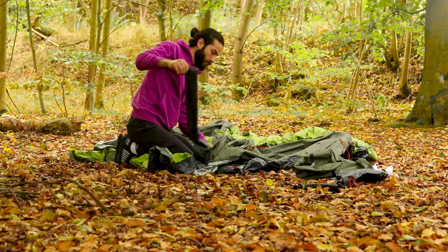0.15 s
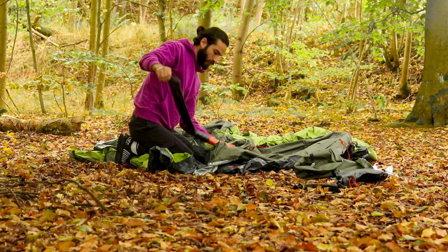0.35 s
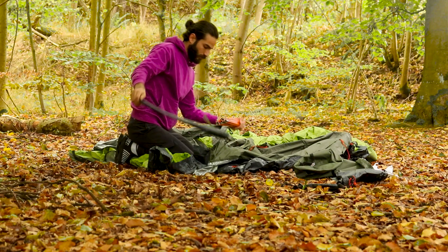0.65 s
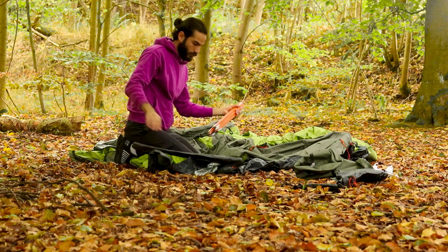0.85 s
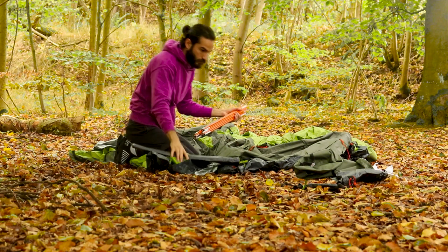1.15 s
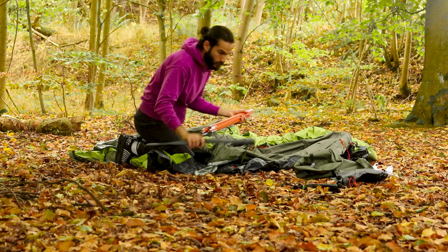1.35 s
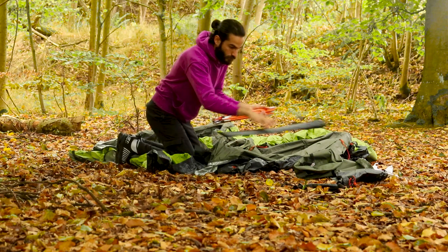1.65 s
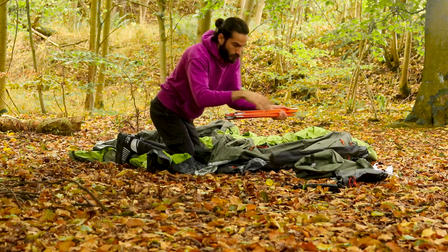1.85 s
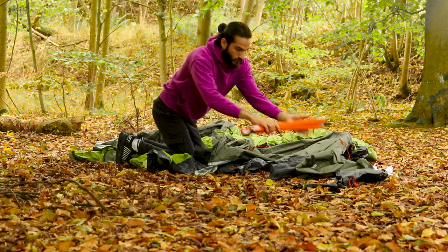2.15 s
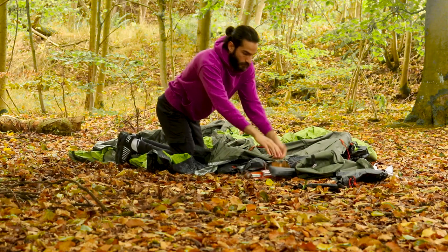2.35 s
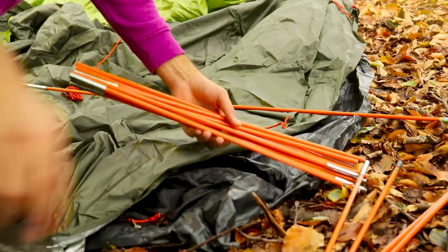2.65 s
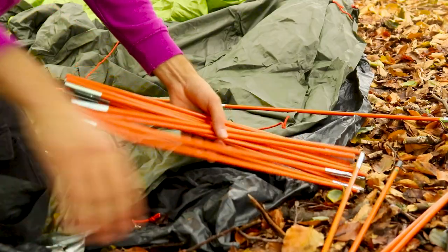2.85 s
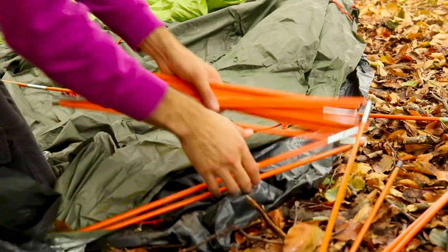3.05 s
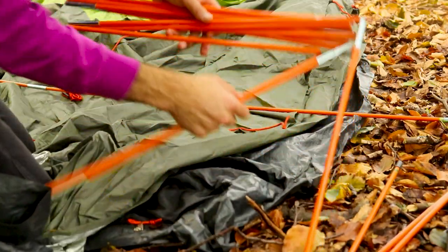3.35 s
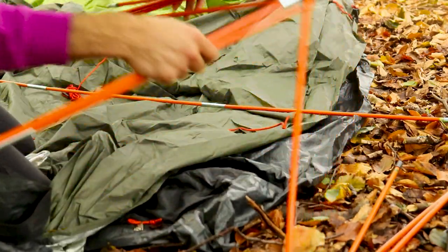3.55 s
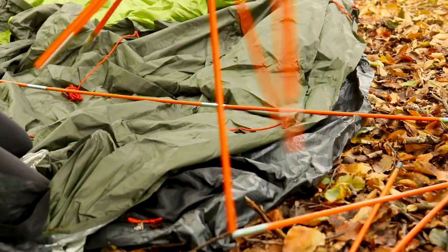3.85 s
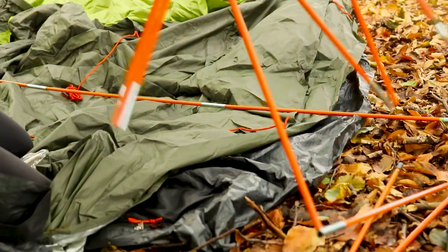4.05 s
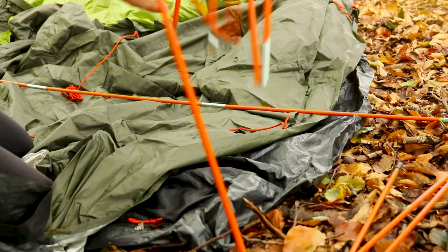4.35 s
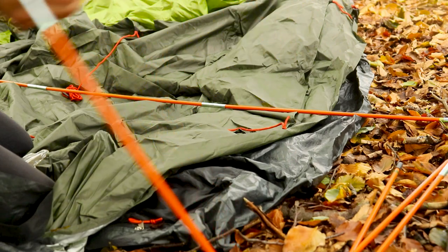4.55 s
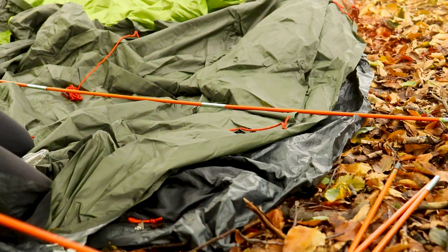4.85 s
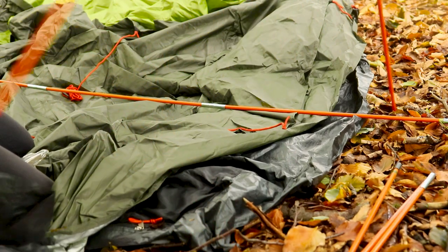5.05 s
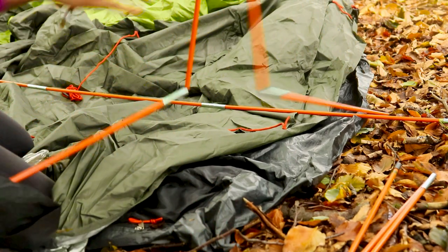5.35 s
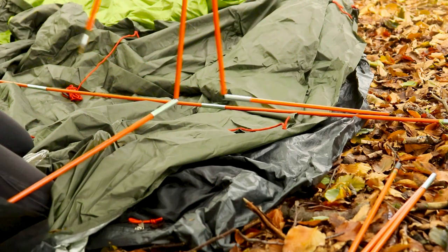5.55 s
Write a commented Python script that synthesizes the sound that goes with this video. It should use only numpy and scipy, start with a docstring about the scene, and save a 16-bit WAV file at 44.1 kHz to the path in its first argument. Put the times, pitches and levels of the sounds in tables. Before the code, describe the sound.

Quiet at first: a bag rubs off tent poles, with soft clothing movement and a few weak clicks. Then a brief dense metallic clatter, crackling fabric and leaves, and irregular hard clacks of hollow tubes with short thin rings. After the strongest cluster it thins to scattered clicks, soft thuds and rustles. Dry, close stereo sound outdoors, soft still air and a barely audible low distant drone.

```python
"""Tent poles in a quiet wood

A bundle of aluminium tent poles slides out of its hissing nylon bag, clatters in the hand and unfolds.
Corded segments clack, built from noise cracks and fading tones, and knock on the tent sheet and dry leaves.
Shaped noise and random ticks make the cloth, leaves and still air; a wavering tone drones faintly far off."""
import sys
import numpy as np
from scipy import signal
from scipy.fft import rfft, irfft, next_fast_len
from scipy.io import wavfile
from scipy.ndimage import map_coordinates

SR = 44100
rng = np.random.default_rng(int(sys.argv[2]) if len(sys.argv) > 2 else 0)


def to_wav(sig):
    """Store sig (one row per channel, or 1-D mono) as 16-bit WAV at the path in sys.argv[1].

    Samples outside -1..1 are clipped; the rate is SR.
    """
    pcm = np.clip(np.atleast_2d(sig), -1, 1) * 32767
    pcm = np.round(pcm).astype(np.int16)
    wavfile.write(sys.argv[1], SR, pcm.T)  # frames by channels


N = 251811  # length of the scene in samples


def amp(db):
    """Turn decibels into gain."""
    return 10 ** (np.asarray(db) / 20)


def unit(x):
    """Scale a signal to an rms of 1."""
    return x / np.sqrt(np.mean(x ** 2) + 1e-20)


def along(points, hz):
    """Read a curve of (Hz, value) points on a log frequency axis."""
    point_hz, value = np.transpose(points)
    return np.interp(np.log(hz + 1), np.log(point_hz + 1), value)


def wobble(rate):
    """Draw a smooth random curve with this many knots a second."""
    knots = rng.standard_normal(int(N * rate / SR) + 4)
    return map_coordinates(knots, [np.arange(N) * rate / SR])


def filtered(x, response):
    """Multiply the spectrum of a sound by a function of frequency."""
    n = x.shape[-1]
    padded = next_fast_len(n + 4096)
    spectrum = rfft(x, padded) * response(np.fft.rfftfreq(padded, 1 / SR))
    return irfft(spectrum, padded)[..., :n]


def spread(pair, spectrum, alike):
    """Colour two signals and mix them to stereo with a middle of rms 1; less alike means wider."""
    def response(hz):
        turn = np.arccos(np.clip(along(alike, hz), -.9, 1)) / 2
        return amp(along(spectrum, hz)) * [np.ones_like(hz), np.tan(turn)]
    mid, side = filtered(pair, response)
    return np.array([mid + side, mid - side]) / np.std(mid)


def grains(rate, scatter_db):
    """Noise whose level flutters at random, like many tiny contacts of scattered size."""
    return rng.standard_normal((2, N)) * amp(scatter_db * wobble(rate))


def snaps(rate):
    """Single sharp ticks of scattered size at random moments, this many a second on average, rms 1."""
    happens = rng.random((2, N)) < rate / SR
    size = rng.uniform(0.11, 1, (2, N))
    return unit(happens * size * rng.choice([-1, 1], (2, N)))


def swells(rows, stretch=1):
    """Gain of overlapping movements (s, length, dB): each rises and falls evenly in dB."""
    s, length, db = np.transpose(rows)[:, :, None]
    t = (np.arange(N) / SR - s) / (length * stretch)
    rise = 0.4054  # share of the length spent rising; a negative length runs the shape backwards
    steps_down = np.minimum(np.maximum(-t / rise, t / (1 - rise)), 10)
    return np.linalg.norm(amp(db - 20 * steps_down), axis=0)


def add(track, s, sound):
    """Mix a sound into the track, starting at s seconds."""
    part = track[:, round(s * SR):][:, :sound.shape[1]]
    part += sound[:, :part.shape[1]]


def bundle_modes(t, colour, t60, apart=0.599, count=160):
    """The crowded, quickly damped modes of joined tubes; the high ones reach the two ears differently."""
    hz = 900 + 15000 * ((np.arange(count) + rng.random(count)) / count) ** 1.3
    size = amp(along(colour, hz) + 2.89 * rng.standard_normal(count)) * hz ** 0.05
    life = t60 * np.exp(0.394 * rng.standard_normal((count, 1)))
    phase = rng.uniform(0, 2 * np.pi, (count, 1))
    skew = apart * (hz[:, None] / 7000) ** 2.09 * rng.standard_normal((count, 1))
    fade = size[:, None] * amp(-60 * t / life)
    angle = 2 * np.pi * hz[:, None] * t + phase
    return np.array([np.sum(fade * np.sin(angle + ear * skew), 0) for ear in (-1, 1)])


# Tone of the still air. Each row: frequency in Hz, relative level in dB per Hz.
AIR_TONE = [(15, -46), (25, -16.5), (58, -7), (114, -4), (200, -4.5), (335, -6.5), (641, -10.5),
            (818, -9.5), (887, -10.5), (1370, -14.5), (2610, -19), (2910, -22), (4370, -18), (5570, -20.5),
            (16000, -28.5)]
# How alike the open air is at left and right. Each row: frequency in Hz, likeness (1 is identical).
AIR_LIKENESS = [(100, 0.67), (400, 0.17), (3000, 0.083), (10000, 0.106)]
# Swells of the far drone. Each row: peak time in seconds, length in seconds within 20 dB of the peak
# (negative swaps rise and fall), level in dB around which it wavers.
FAR_DRONE = [(3.0, -0.03, -73), (4.25, 4, -70), (5.2, 1.85, -75.5)]


def forest(air_db=-64.5, drone_hz=174, drift_hz=4):
    """Still air among the trees is soft noise; a far drone is one tone that drifts in pitch."""
    air = spread(rng.standard_normal((2, N)), AIR_TONE, AIR_LIKENESS)
    air = air * amp(air_db + 0.4 * wobble(3.71))
    hz = drone_hz + drift_hz * wobble(2.1) + 1.625 * wobble(8)
    drone = np.sqrt(2) * np.sin(2 * np.pi * np.cumsum(hz) / SR)
    return air + swells(FAR_DRONE) * amp(1.5 * wobble(9.7)) * drone


# How long the wood echoes. Each row: frequency in Hz, time in seconds to fade by 60 dB.
WOOD_ECHO = [(300, 0.22), (2000, 0.205), (6000, 0.362), (14000, 0.14)]


def trees(x):
    """Trunks and ground scatter back a faint, diffuse tail, made from fading noise."""
    hz, t, bins = signal.stft(rng.standard_normal((2, SR // 2)), SR, nperseg=256)
    fade = amp(-60 * t / along(WOOD_ECHO, hz)[:, None])
    tail = signal.istft(bins * fade, SR, nperseg=256)[1]
    return signal.fftconvolve(x, tail / np.linalg.norm(tail[0]), axes=1)[:, :N]


# Tone of soft rubbing cloth. Each row: frequency in Hz, relative level in dB per Hz.
RUB_TONE = [(71, -45.5), (120, -17), (382, -5.5), (770, -7), (955, -6), (1530, -4), (2030, -4.5),
            (3000, -5.5), (3900, -10.5), (6600, -120)]
# Tone of crisp creases and leaves. Each row: frequency in Hz, relative level in dB per Hz.
CRINKLE_TONE = [(900, -25.5), (1800, -6), (2800, -3), (5000, -0.5), (8000, -4.5), (12000, -13.5),
                (16000, -22)]
# How alike the spread-out cloth is at left and right. Each row: frequency in Hz, likeness (1 is identical).
CLOTH_LIKENESS = [(500, 0.985), (1400, 0.858), (3000, 0.277), (7000, 0.046)]
# Movements of sleeves, sheet and leaves; the first row is the crisp hiss of the bag as it opens. Each row: #
# peak time in seconds, length in seconds within 20 dB of the peak (before crinkle_stretch), soft rub in dB #
# and crisp crinkle in dB (before the trims below).
CLOTH_MOVES = [(.005, 0.3027, -71.5, -50), (0.897, 0.334, -61.5, -61), (1.34, 0.3737, -60, -60.5),
               (1.494, 0.14, -63, -74), (1.976, 0.33, -62, -63.5), (2.31, 1.24, -85.5, -64),
               (2.404, 0.0649, -51, -52.5), (2.444, 0.099, -39, -46.5), (2.528, 0.0719, -49.5, -54.5),
               (2.77, 0.14, -64, -55.5), (2.923, 0.1024, -43.5, -39), (3.07, 0.27, -48.5, -46),
               (3.178, 0.2032, -46.5, -43.5), (3.262, 0.05, -43.5, -48.5), (3.367, 0.2652, -52, -47),
               (3.69, 0.4, -63.5, -51), (3.796, 0.5055, -60, -47), (3.938, 0.48, -71.5, -51),
               (4.37, 0.65, -64, -67.5), (4.52, 0.36, -67.5, -47), (5.003, 0.2168, -51, -45.5),
               (5.131, 0.2745, -49, -46.5), (5.176, 0.2477, -47, -50), (5.28, 1.96, -67, -73.5),
               (5.497, 0.0861, -59, -49.5), (5.541, 0.2742, -55.5, -62.5)]


def rustle(rub_trim_db=-1, crinkle_trim_db=-2, snap_share=0.618, crinkle_stretch=0.958):
    """With each movement cloth rubs softly while creases and dry leaves crackle in clumps."""
    s, length, soft_db, crisp_db = np.transpose(CLOTH_MOVES)
    # the cloth is never quite still, and this faint stirring is 4.5 dB louder from 2.4 s on
    near_db = 4.5 * (np.arange(N) / SR > 2.4)
    soft = np.hypot(swells(np.c_[s, length, soft_db]), amp(-74 + near_db))
    crisp = np.hypot(swells(np.c_[s, length, crisp_db], crinkle_stretch), amp(-75 + near_db))
    clumps = wobble(70)
    rub = spread(grains(rate=220, scatter_db=1.5), RUB_TONE, CLOTH_LIKENESS)
    rub = rub * soft * amp(rub_trim_db + 3.01 * clumps)
    creases = unit(grains(rate=490, scatter_db=1.0)) + snap_share * snaps(rate=72)
    crinkle = spread(creases, CRINKLE_TONE, CLOTH_LIKENESS)
    return rub + crinkle * crisp * amp(crinkle_trim_db + 2 * clumps)


# Tone of nylon on the poles. Each row: frequency in Hz, relative level in dB per Hz.
NYLON_TONE = [(410, -49), (700, -17.5), (798, -14), (997, -12.5), (1120, -4.5), (2660, 0), (3280, -3.5),
              (8310, -14), (12600, -25.5), (16000, -34.5)]
# How alike bag and poles are at left and right. Each row: frequency in Hz, likeness (1 is identical).
POLE_LIKENESS = [(200, 0.983), (1500, 0.9), (3000, 0.65), (6000, 0.4), (12000, 0.25)]
# Tugs that draw the bag off the poles. Each row: peak time in seconds, length in seconds within 20 dB
# of the peak, level in dB before the trim below.
BAG_TUGS = [(.005, .5, -54.5), (.195, 0.2564, -46.5), (.275, 0.2258, -50.5), (.33, 0.1384, -48),
            (.393, 0.11, -54.5), (.477, 0.02, -52.5), (.56, 0.1847, -49.5)]


def bag(trim_db=-.5, catch_share=0.423):
    """Nylon hisses along the poles at each tug and its seams tick as they catch."""
    friction = unit(grains(rate=720, scatter_db=2.0)) + catch_share * snaps(rate=130)
    hiss = spread(friction, NYLON_TONE, POLE_LIKENESS)
    return swells(BAG_TUGS) * amp(trim_db + wobble(69.8)) * hiss


# Poles and hands landing on the sheet. Each row: start in seconds, level in dB, then the tone against
# 700 Hz: low end in dB near 200 Hz, tap in dB near 2 kHz, treble in dB (lowered by 6 at 7 kHz).
SHEET_KNOCKS = [(2.430, -43, 17.5, 1, 11.5), (2.445, -39.5, 15, 2, 16.5), (2.8708, -51, -16.5, 3.5, -21),
                (2.929, -54.5, 11, -8, 5.5), (3.004, -52, -5.5, 5, -3), (3.072, -46, 3.5, 3, 9.5),
                (3.138, -50.5, 1, -4.5, -9), (3.1707, -46, -4, 2, 5), (3.286, -52, 6.5, 6.5, -3),
                (3.805, -57, -27.5, -1.5, -7.5), (4.388, -54.5, 16.5, 1.5, 10.5), (4.976, -43, 9, 12.5, 13),
                (4.989, -47.5, 22, -2, -12.5), (5.02, -56.5, 1, 11.5, 11), (5.1402, -44, 0.5, 12, -13.5),
                (5.1679, -42, -3.5, 9, 6.5), (5.2062, -46.5, 1.5, 18, 7), (5.215, -54.5, 3.5, 11, -14.5),
                (5.555, -54, -1, 10, -33.5), (5.577, -54.5, 2.5, 5, -27.5)]


def knocks(thud_t60=0.0747, tap_t60=0.0255, attack=0.000778, snap=12):
    """The padded ground gives a dull thud, the taut sheet a shorter tap; times are in seconds."""
    track, t = np.zeros((2, N)), np.arange(SR // 8) / SR
    head = SR // 90  # the first 11 ms set the level
    for s, db, low_db, tap_db, top_db in SHEET_KNOCKS:
        colour = [(40, low_db - 34.5), (90, low_db - 5), (260, low_db), (700, 0.0049), (1800, tap_db),
                  (3500, (tap_db + top_db) / 2), (7000, top_db - 6.0), (16000, top_db - 18)]
        contact = rng.standard_normal((2, len(t)))
        contact[0, SR // 600] += snap  # one sharp snap as the sheet pulls tight
        blow = spread(contact, colour, POLE_LIKENESS)
        thud = filtered(blow, lambda hz: 1 / (1 + (hz / 1100) ** 8))
        tap = (blow - thud) * amp(-60 * t / tap_t60)
        thud = thud * amp(-60 * t / thud_t60)
        knock = (thud + tap) * (1 - np.exp(-t / attack))
        add(track, s, amp(db) * knock / np.std(thud[:, :head]))
    return track


# Tone of a light touch. Each row: frequency in Hz, relative level in dB per Hz.
TOUCH_TONE = [(700, -29.5), (1800, -11), (2800, -1.5), (5000, 2), (8000, -1.5), (12000, -18.5),
              (16000, -21.5)]
# Dangling segments jostle. Each row: peak time in seconds, length in seconds within 20 dB of the peak,
# level in dB.
SEGMENT_JOSTLES = [(2.31, 0.29, -60), (3.245, 0.32, -50), (3.75, 0.52, -58.5), (3.95, 0.35, -59),
                   (4.085, 0.02, -46.5), (4.4, 0.23, -48.5)]


def jostle(ring_t60=0.0395, tick_share=0.9):
    """The dangling segments touch lightly at random and ring."""
    touches = snaps(rate=79)
    tubes = bundle_modes(np.arange(SR // 16) / SR, [(1000, 0), (16000, 0)], ring_t60)
    rung = unit(signal.fftconvolve(touches, tubes, axes=1)[:, :N])
    return swells(SEGMENT_JOSTLES) * spread(rung + tick_share * touches, TOUCH_TONE, POLE_LIKENESS)


# Tone of the clattering bundle. Each row: frequency in Hz, relative level in dB per Hz.
BUNDLE_TONE = [(530, -49), (900, -27.5), (1370, -23.5), (1490, -19.5), (2300, -20), (3260, -7),
               (3640, -8.5), (5040, 0.5), (5750, -5), (7060, -1), (9880, -6.5), (16000, -16)]


def clatter(ring_share=0.31, ring_t60=0.045, snap_share=0.35):
    """All the segments roll and scrape over each other, a dense train of contacts in ringing tubes."""
    contacts = unit(rng.standard_normal((2, N))) + snap_share * snaps(rate=500)
    tube_colour = [(1000, -1.5), (7000, -0.5), (16000, -6.5)]
    tubes = bundle_modes(np.arange(SR // 16) / SR, tube_colour, ring_t60, count=300)
    rung = unit(signal.fftconvolve(contacts, tubes, axes=1)[:, :N])
    # the bundle jolts in the hand and slides on, slowing, until the grip stops it
    jolt_s, attack_s, jolt_db, jolt_t60 = 2.428, 0.01765, -16.5, 0.112
    skid_db, skid_sag_db_per_s, skid_s, grip_t60 = -23, 108.5, 0.0784, 0.0223
    t = np.arange(N) / SR - jolt_s
    after = np.maximum(t - attack_s, 0)
    jolt = amp(jolt_db - 60 * after / jolt_t60)
    skid = amp(skid_db - skid_sag_db_per_s * after)
    grip = amp(-60 * np.clip((after - skid_s) / grip_t60, 0, 2))
    motion = np.clip(t / attack_s, 0, 1) * np.hypot(jolt, skid) * grip
    return motion * spread(unit(contacts) + ring_share * rung, BUNDLE_TONE, POLE_LIKENESS)


# Bending modes of a free segment. Each row: frequency in Hz before detuning, relative level in dB before
# the contact's colour and some scatter, time in seconds to fade by 60 dB.
TUBE_MODES = [(1574, -13.5, .22), (2049, 4.5, 0.18), (3210, -15.5, 0.17), (3710, -14, 0.16),
              (4400, -13.5, 0.26), (5420, -5, 0.202), (6530, -1.5, 0.32), (6300, -12, 0.275),
              (7310, 4.5, 0.22), (8820, -2, 0.38), (9470, -4.5, 0.29), (10500, -10.5, .24),
              (11700, -22, .25)]


def tube_ring(t, colour, detune=0.025):
    """One segment rings on; no two are tuned alike, and the cord rattling inside roughens each line."""
    hz, db, t60 = np.transpose(TUBE_MODES)[:, :, None]
    hz = hz * (1 + detune * rng.standard_normal(hz.shape))
    size = amp(db + .5 * along(colour, hz) + 2 * rng.standard_normal(hz.shape))
    rattle = np.cumsum(rng.standard_normal((len(hz), len(t))), 1) / np.sqrt(SR / 80)
    phase = 2 * np.pi * (hz * t + rng.random(hz.shape)) + rattle
    ears = 0.29 * rng.standard_normal((2, len(hz), 1))
    ring = np.sum(size * amp(-60 * t / t60) * np.sin(phase + ears), 1)
    return ring / np.linalg.norm(size)


def clack_colour(mode_hz, low_db, high_db, top_db, mode_db=7, width_hz=330):
    """The hardness of a contact tilts its spectrum; the spot that is struck favours one group of modes."""
    hz = np.geomspace(200, 16000, 200)
    tilt = [(300, low_db - 24.5), (1000, low_db - 21.0), (2100, low_db - 1), (3800, 0),
            (7000, high_db), (11500, top_db), (16000, top_db - 14.0)]
    favoured = mode_db / (1 + ((hz - mode_hz) / width_hz) ** 2)
    return np.transpose([hz, along(tilt, hz) + favoured])


# Pole against pole. Each row: start in seconds, level in dB, favoured mode in Hz, body in dB (lowered by 1
# near 2 kHz), brightness in dB at 7 kHz (both against 4 kHz and before the favoured mode is lifted),
# time in seconds to fade by 60 dB (before damping).
POLE_CLACKS = [(0.4978, -52, 8300, -2, 4.5, 0.0043), (0.5304, -45.5, 2890, 12.5, -8.5, 0.0133),
               (0.581, -48.5, 2800, -1.5, -10, .011), (1.2817, -51.5, 3744, 9, 6, 0.0058),
               (1.318, -53.5, 1530, 2, 0, 0.0195), (2.064, -52.5, 4250, -2.5, -2, 0.038),
               (2.073, -50, 5380, -10, -2, 0.018), (2.116, -56, 4420, -5, -3.5, 0.085),
               (2.209, -49, 4400, -31, -14, 0.0098), (2.4116, -43.5, 5170, 8, 7.5, 0.09),
               (2.539, -45, 4470, 0, -1, 0.0218), (2.566, -56.5, 2480, 4, -3, 0.0245),
               (2.7466, -35.5, 6050, -8.5, -1.5, 0.0171), (2.8724, -38.5, 2160, 17.5, -9, 0.0093),
               (2.91, -35.5, 7620, -10.5, 4.5, 0.129), (3.051, -43, 5500, -22, -7.5, 0.0176),
               (3.1424, -35, 8460, -10, 1.5, 0.023), (3.1554, -37.5, 3260, -6, 5, 0.023),
               (3.1989, -36.5, 5550, -5.5, -5, 0.0045), (3.2755, -39.5, 3370, -1, -11.5, 0.0294),
               (3.3036, -43, 5450, -0.5, 0.5, 0.0047), (3.4002, -27, 4373, -11.5, -9, 0.0144),
               (3.5133, -51.5, 5220, -4, -3, 0.0132), (3.5576, -47, 4150, -28.5, -9, 0.009),
               (3.6516, -36, 4432, -13.5, -6, 0.027), (3.6713, -42, 3760, -4, -5.5, 0.091),
               (3.731, -30, 8300, -7.5, 3.5, 0.0273), (3.748, -45, 7620, -6, -6, .02),
               (3.7683, -44, 4150, -7, -10.5, 0.036), (3.7855, -40.5, 4430, -5, -13, 0.056),
               (3.7951, -29.5, 6160, -14, 6.5, 0.0184), (3.8387, -43.5, 8650, -2.5, 2.5, 0.037),
               (3.88, -28, 4984, -17, 4, 0.0264), (3.9074, -33, 8480, -11.5, 2.5, 0.012),
               (3.9656, -29.5, 6330, -4, 0.5, 0.0767), (3.976, -26, 7370, -8.5, 6.5, 0.013),
               (4.0607, -26, 9480, -1.5, 7.5, 0.0196), (4.0688, -37, 8500, -9.5, 1.5, 0.048),
               (4.078, -32, 8360, -1.5, 4.5, 0.021), (4.092, -42.5, 9440, -1.5, 3.5, 0.019),
               (4.2823, -51, 7250, -6, -4.5, 0.027), (4.3046, -42, 5430, 1.5, -0.5, 0.106),
               (4.3295, -18, 4150, -11.5, 3, 0.0443), (4.339, -27, 8470, -14.5, -4, 0.048),
               (4.3807, -23, 8460, -6, -4, 0.0202), (4.4236, -43, 2930, -7, -0.5, 0.0176),
               (4.4829, -25.5, 2420, 4.5, 4.5, 0.0344), (4.5623, -43.5, 6470, -5, -2, 0.028),
               (4.607, -40, 6832, 10.5, 5, 0.0574), (4.7975, -50, 3210, -1, -7, 0.073),
               (4.8463, -49.5, 7480, -3, 0, 0.019), (4.9382, -53.5, 2450, 8, -2, 0.0174),
               (4.9658, -31, 8730, 0, 0.5, 0.0565), (4.972, -35.5, 4970, -4.5, -5.5, 0.052),
               (5.057, -44, 4280, 1, -0.5, 0.06), (5.0912, -38, 8510, 1.5, 4.5, 0.0385),
               (5.1178, -40, 8560, 13.5, 9.5, 0.0167), (5.4531, -50.5, 4690, -5, 5, 0.029),
               (5.471, -48, 2590, -6, -10, 0.074), (5.487, -42.5, 9300, -9.5, 11.5, 0.053),
               (5.575, -50.5, 1740, 12, 13, 0.016), (5.7001, -47.5, 5190, 20, 12.5, 0.0031)]


def clacks(crack_db=-1, crack_t60=0.00553, damping=0.969, attack=0.000224, rebound=0.497, early_db=-21,
           ping_db=-12, ring_db=-30.0, ring_slope=0.793):
    """A faint early copy of the hit, a crack with a short clank of joined tubes, a rebound and a thin ring."""
    track, t = np.zeros((2, N)), np.arange(int(SR * .3)) / SR
    brief, head = t[:SR // 16], SR // 125

    def level(x):
        """Scale to rms 1 over the first 8 ms."""
        return x / np.std(np.atleast_2d(x).mean(0)[:head])

    for s, db, mode_hz, body_db, bright_db, t60 in POLE_CLACKS:
        top_db = bright_db - 7 + 0.1231 * (db + 33)  # softer blows lose more of the top
        colour = clack_colour(mode_hz, body_db, bright_db, top_db)
        clank = bundle_modes(brief, colour, t60 * damping)
        crack = spread(rng.standard_normal((2, len(brief))), colour, POLE_LIKENESS)
        crack = crack * amp(-60 * brief / crack_t60)
        ping = np.sin(2 * np.pi * mode_hz * brief) * amp(-60 * brief / (t60 * damping))
        hit = level(clank) + amp(crack_db) * level(crack) + amp(ping_db) * level(ping)
        hit = hit * (1 - np.exp(-brief / attack))
        add(hit, rng.uniform(.0008, .0022), rebound * hit)  # the tubes chatter before they part
        pan_db = 4.2 * rng.standard_normal()  # contacts fall a little to either side
        hit = amp(db + np.array([[pan_db], [-pan_db]]) / 2) * level(hit)
        add(track, s - rng.uniform(0.0017, .0035), amp(early_db) * hit)
        add(track, s, hit)
        # both segments ring; a hard blow seats the joint, so the ring grows less than the blow
        ring = tube_ring(t, colour) + tube_ring(t, colour)
        add(track, s, amp(ring_slope * db + ring_db) * ring)
    return track


def scene(hits_echo_db=-19, bundle_echo_db=-32):
    """Mix the wood, the cloth and the poles; the single hits and the clatter also echo off the trees."""
    hits, bundle = knocks() + jostle() + clacks(), clatter()
    echo = trees(amp(hits_echo_db) * hits + amp(bundle_echo_db) * bundle)
    return forest() + echo + rustle() + bag() + bundle + hits


def record(dry):
    """A very steep slope removes the sound above about 15.9 kHz."""
    return filtered(dry, lambda hz: 1 / (1 + (hz / 15900) ** 120))


dry = scene()
out = record(dry)
to_wav(out)
```